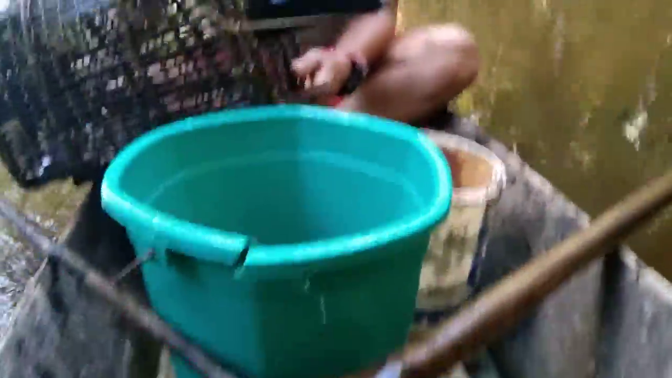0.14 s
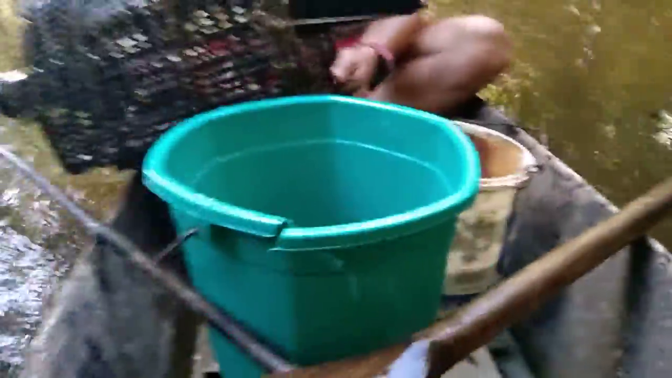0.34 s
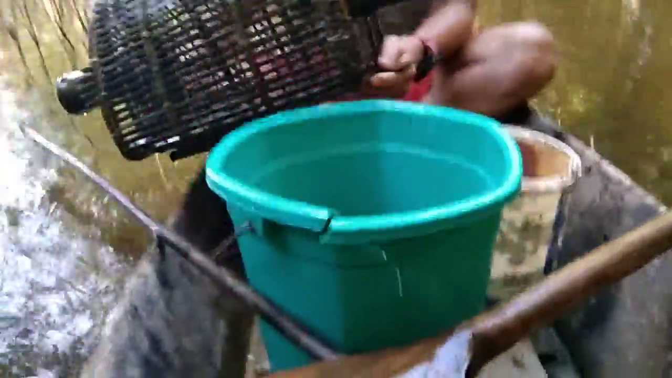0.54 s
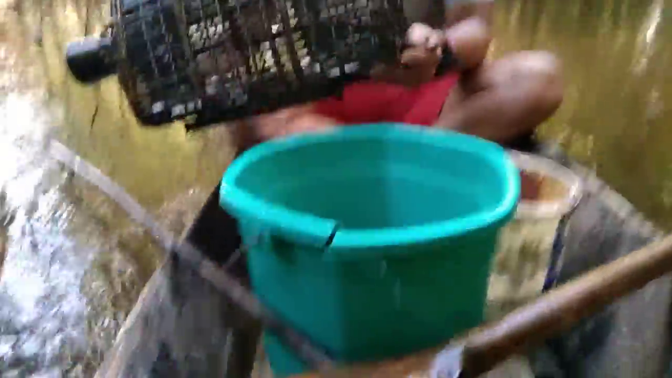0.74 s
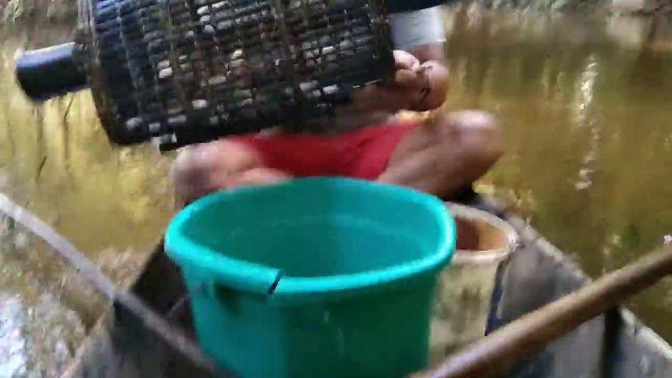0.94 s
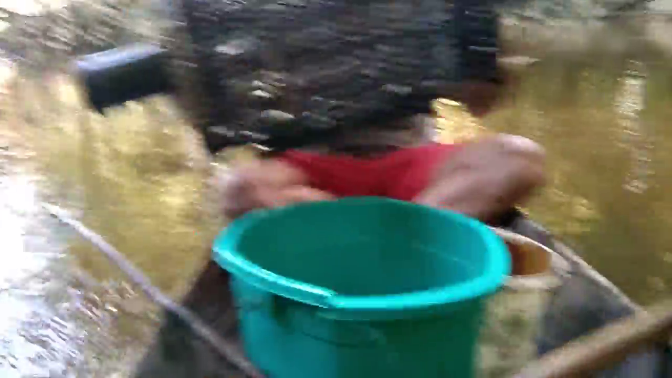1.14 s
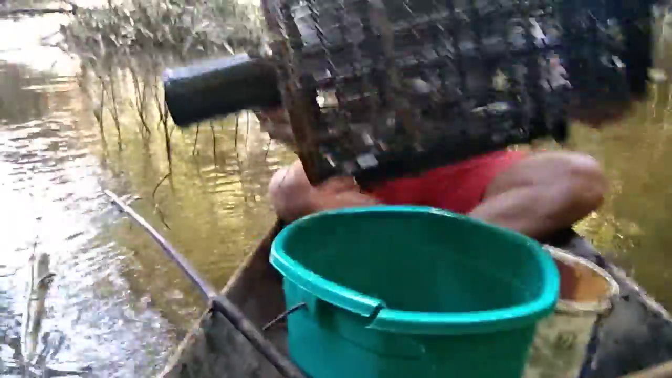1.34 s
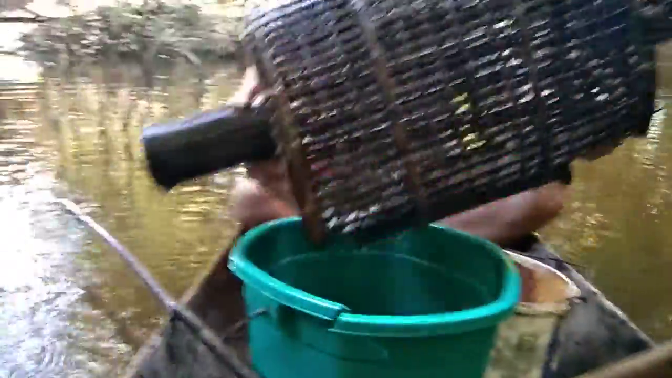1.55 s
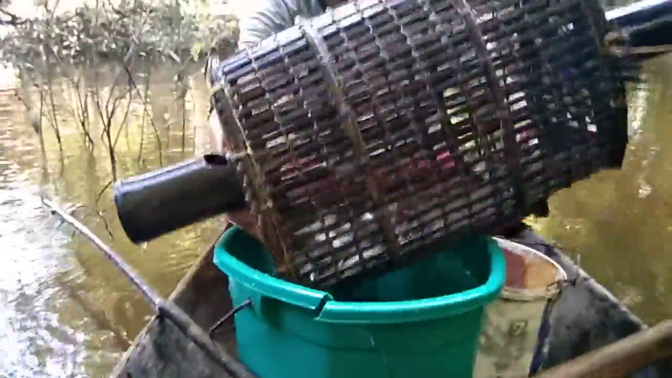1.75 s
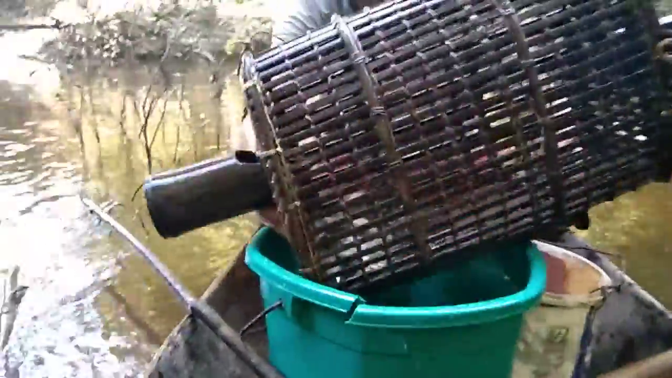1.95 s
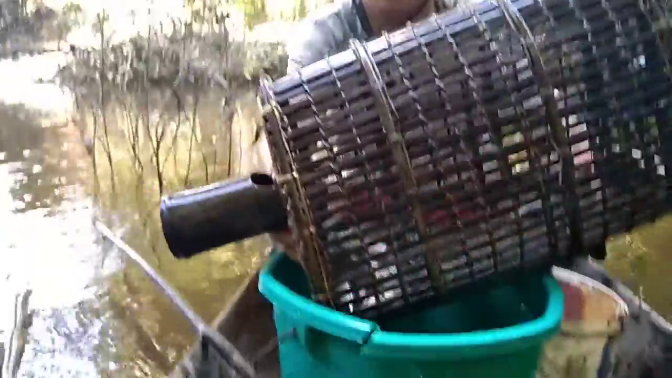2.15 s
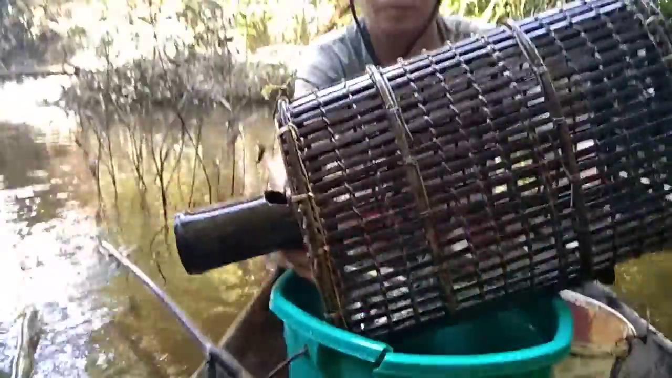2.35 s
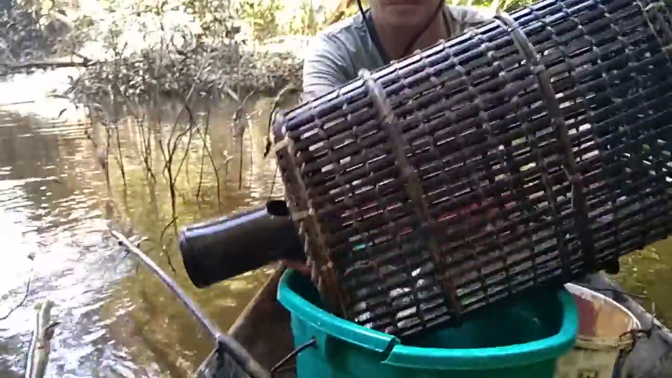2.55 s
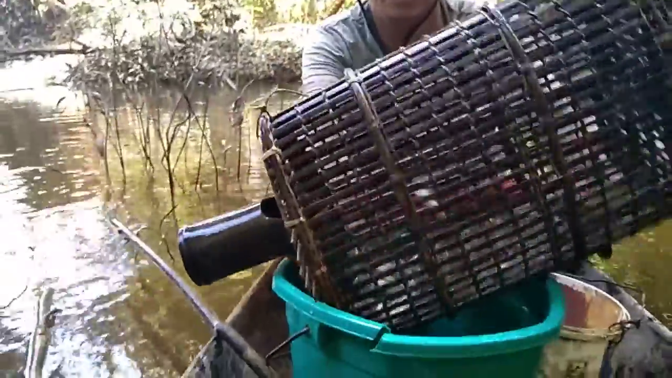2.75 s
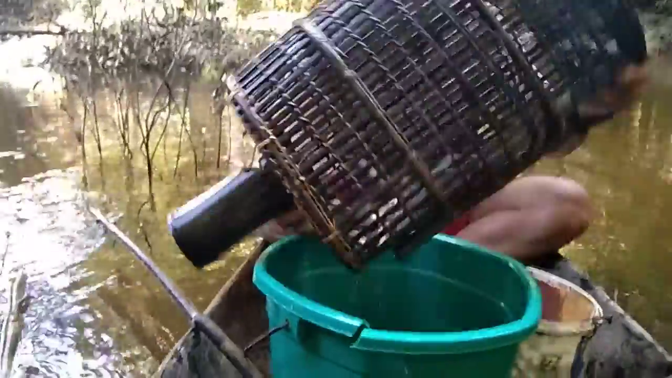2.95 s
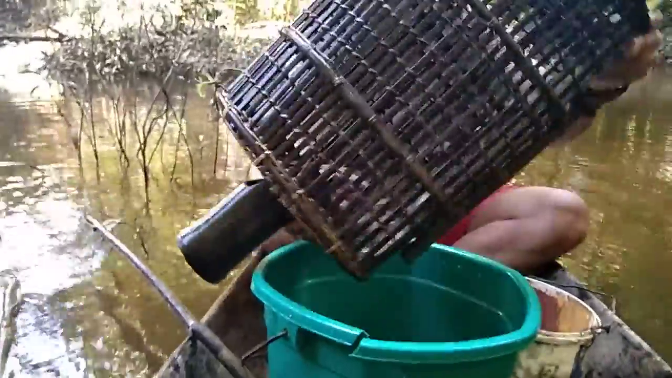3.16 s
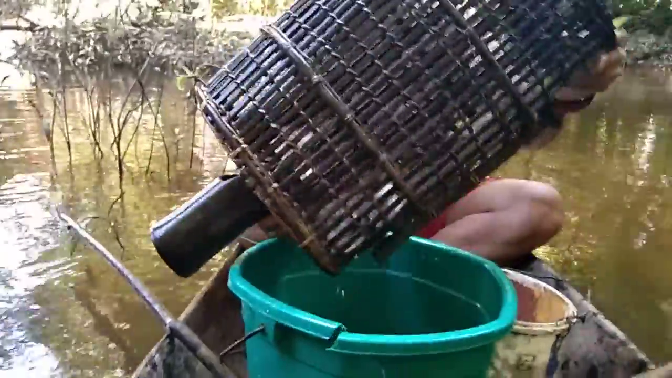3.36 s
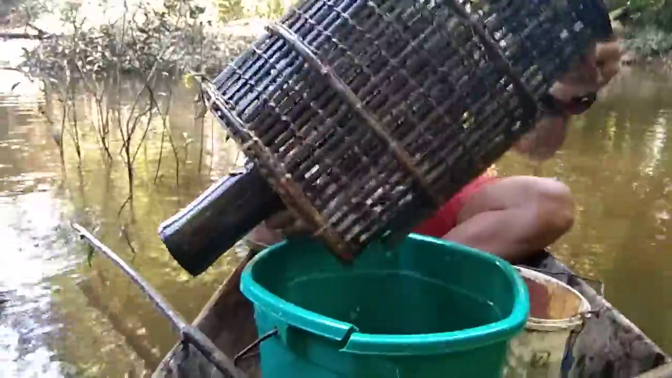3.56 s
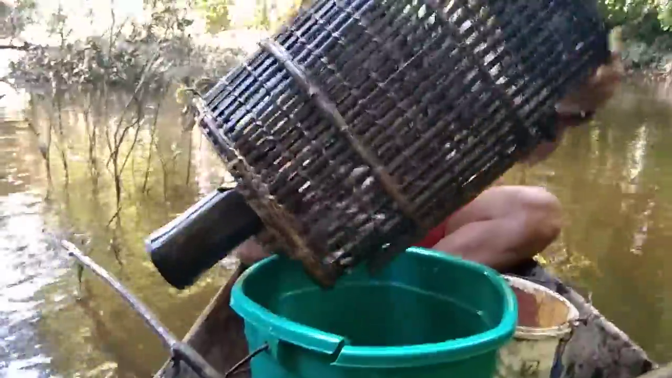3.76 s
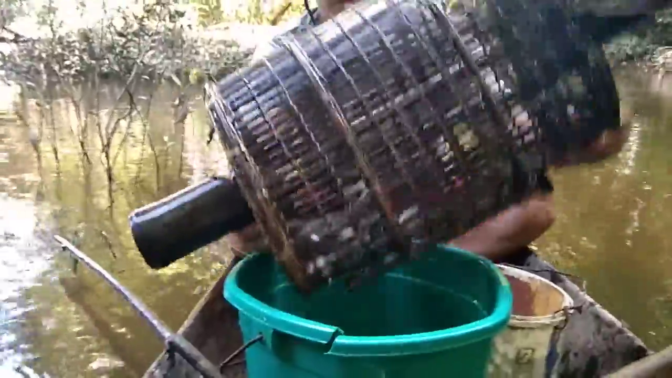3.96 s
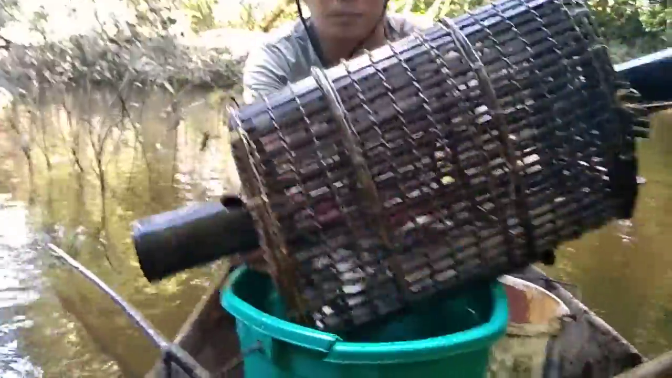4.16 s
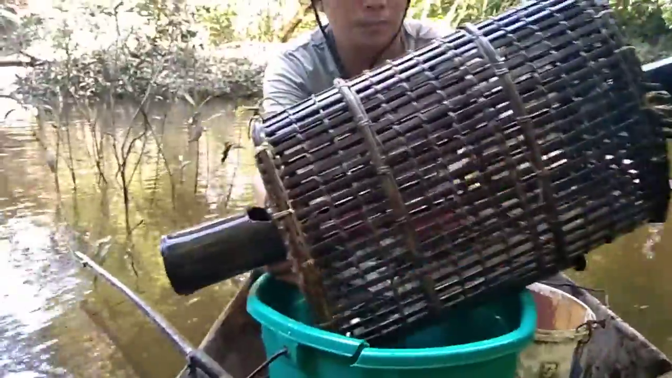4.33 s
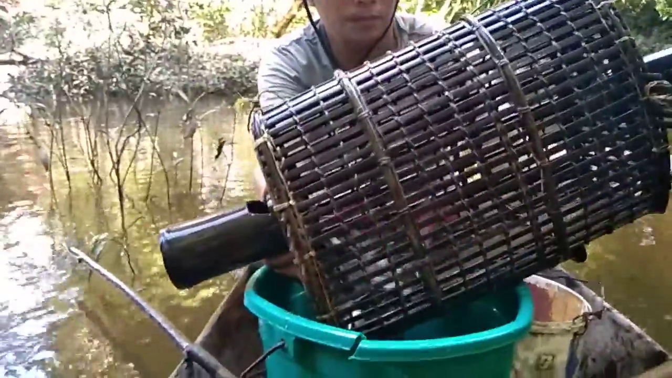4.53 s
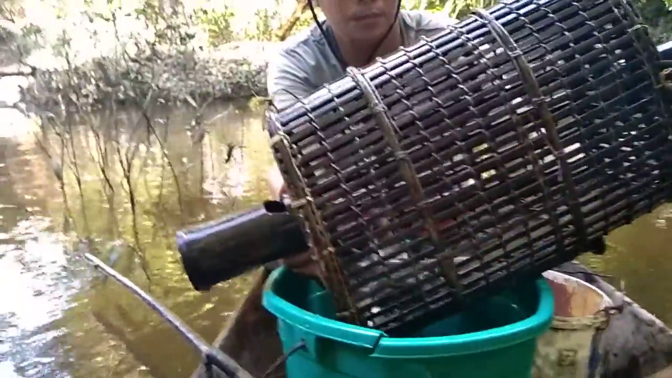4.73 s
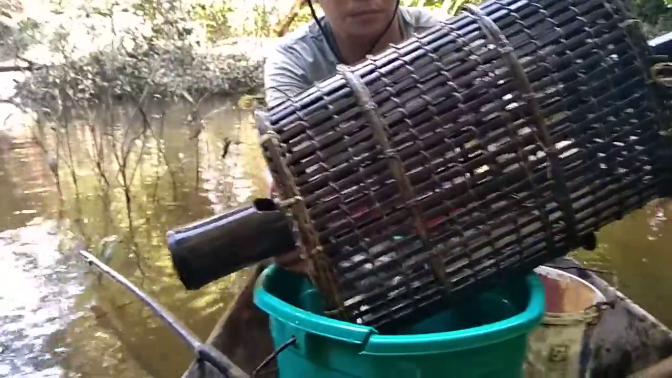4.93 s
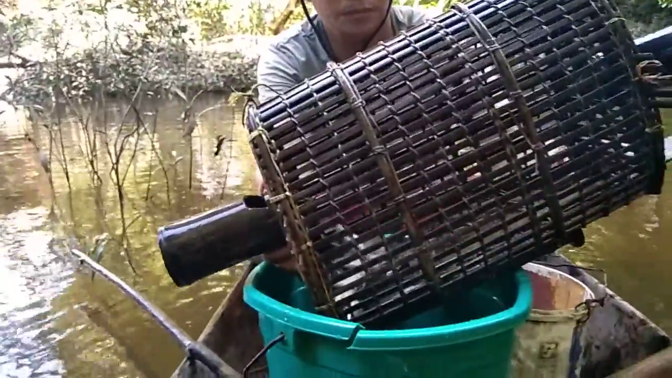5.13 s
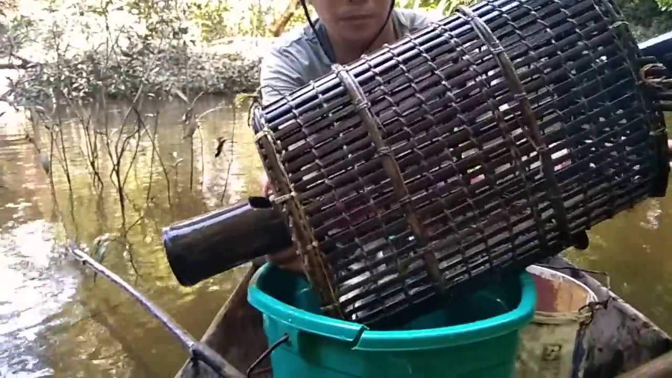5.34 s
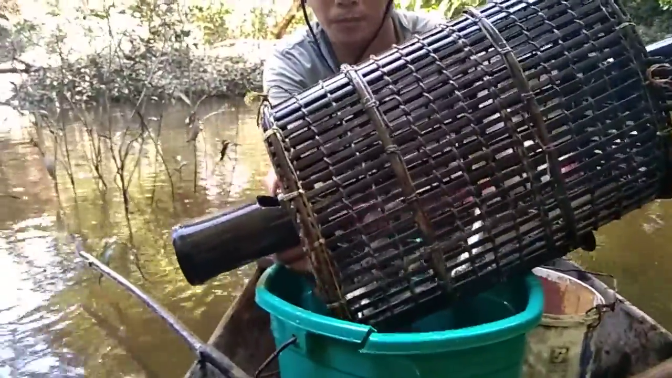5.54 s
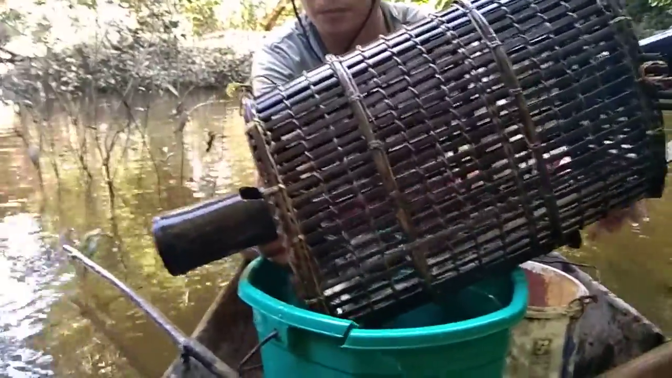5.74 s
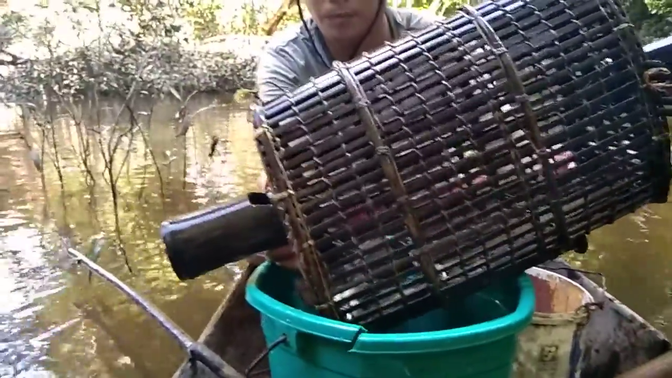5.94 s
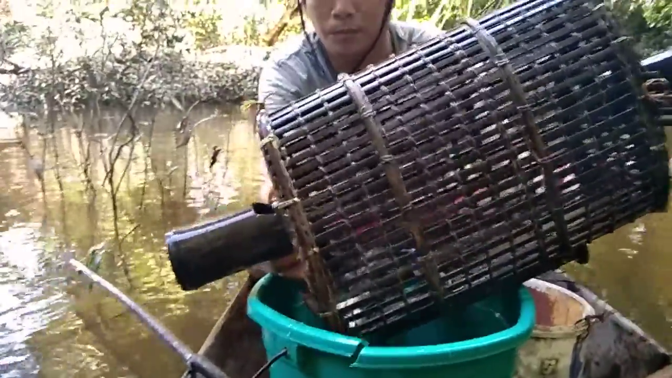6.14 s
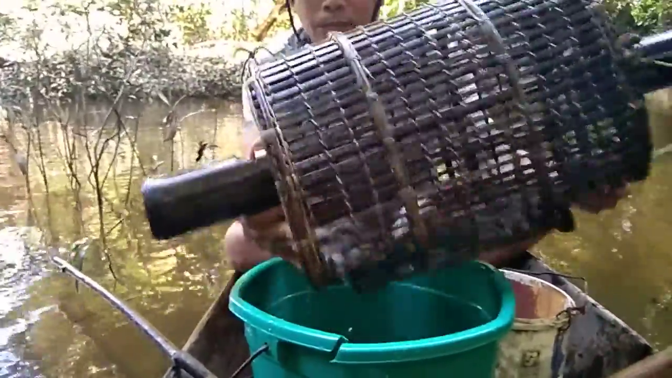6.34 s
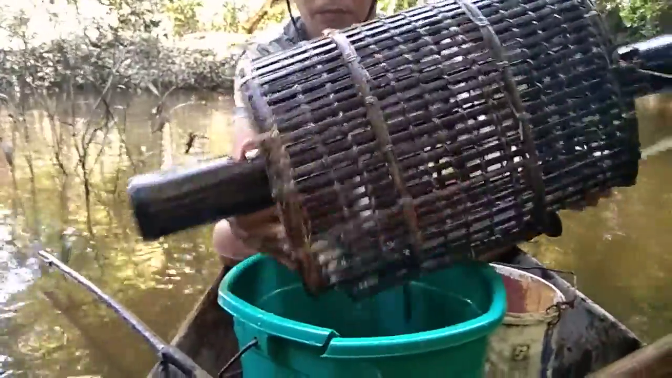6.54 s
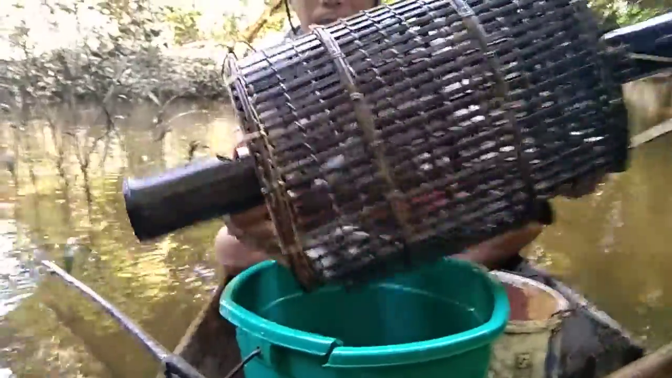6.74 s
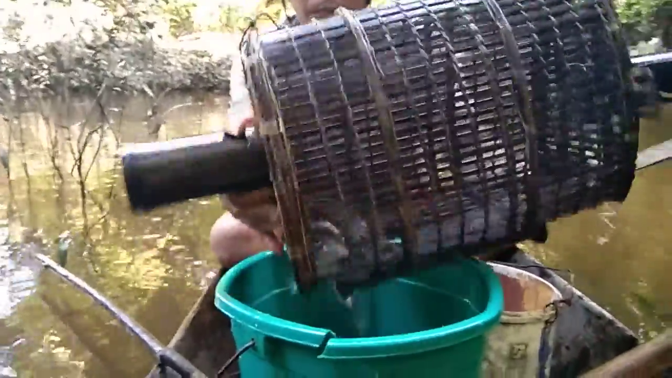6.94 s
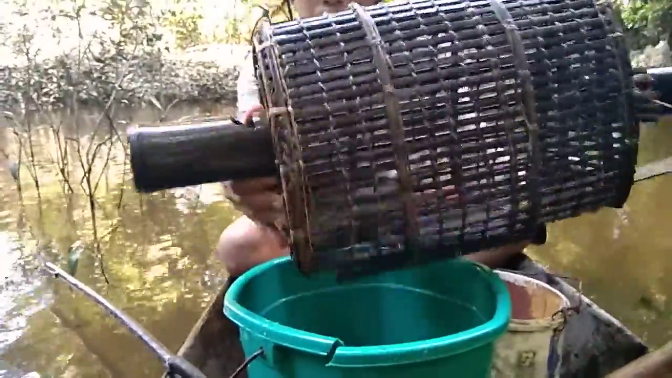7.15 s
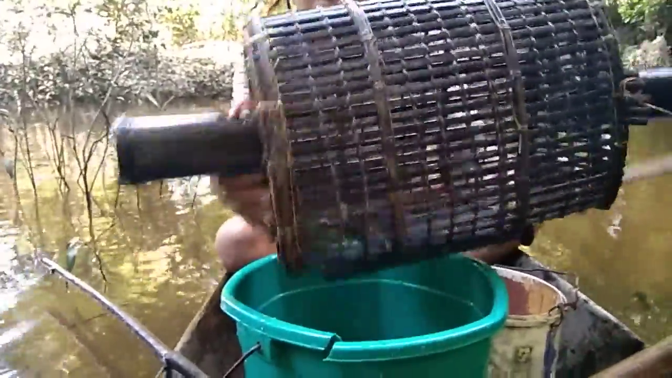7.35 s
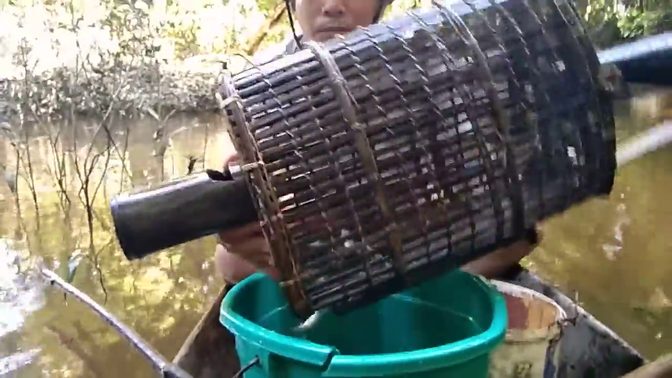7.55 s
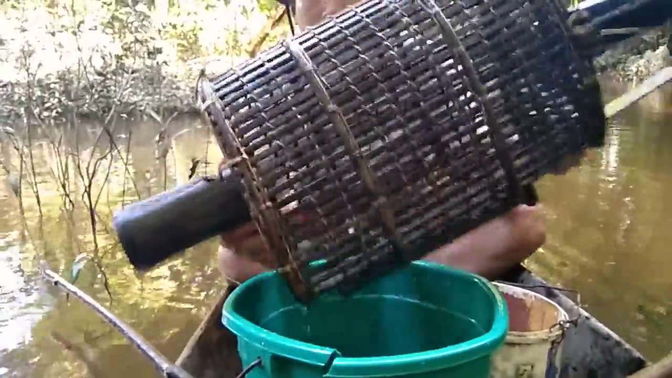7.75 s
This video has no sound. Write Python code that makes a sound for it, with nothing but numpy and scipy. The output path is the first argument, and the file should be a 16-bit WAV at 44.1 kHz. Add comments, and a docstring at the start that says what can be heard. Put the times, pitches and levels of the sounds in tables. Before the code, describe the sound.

Hollow plastic thumps, wet rattling slats and dripping, splashing water come in bursts as a trap is shaken, beneath a thin constant insect whine.

```python
"""A wet slatted fish trap is tipped and shaken over a plastic bucket in a boat on a river.
It knocks on the rim and rings the bucket's damped modes; slats and wet load slap and rattle as bursts of
coloured noise and small ringing modes; water patters, hisses and plops as noise, droplets and rising bubbles.
Insects shrill all the while: beating tones and rasping noise bands.
Faint narrow-band tones, soft gulps under the boat and the river's steady noise lie beneath."""
import sys
import numpy as np
from scipy import signal
from scipy.fft import rfft, irfft, next_fast_len
from scipy.io import wavfile
from scipy.ndimage import uniform_filter1d, map_coordinates

SR = 44100
rng = np.random.default_rng(int(sys.argv[2]) if len(sys.argv) > 2 else 0)


def to_wav(s):
    """Save 16-bit WAV."""
    ch = np.atleast_2d(s).T  # columns
    pcm = np.round(np.clip(ch, -1, 1) * 32767)  # PCM
    wavfile.write(sys.argv[1], SR, pcm.astype(np.int16))


N = 347949
TIME = np.arange(N) / SR


def amp(db):
    """Decibels to gain."""
    return 10 ** (np.asarray(db) / 20)


def unit(x):
    """Scale to rms 1."""
    return x / np.sqrt(np.mean(x ** 2) + 1e-20)


def along(points, hz):
    """(Hz, value) points read on a log frequency axis."""
    f, v = np.transpose(points)
    return np.interp(np.log(hz + 1), np.log(f + 1), v)


def curves(rows):
    """One value per sample for each column after the time."""
    s, *cols = np.transpose(rows)
    return [np.interp(TIME, s, c) for c in cols]


def wobble(rate, size=N):
    """A smooth random curve, rate knots a second."""
    knots = rng.standard_normal(int(size * rate / SR) + 4)
    return map_coordinates(knots, [TIME[:size] * rate])


def filtered(x, response):
    """x times a response of frequency."""
    m = next_fast_len(N + 8192)
    return irfft(rfft(x, m) * response(np.fft.rfftfreq(m, 1 / SR)), m)[:N]


def band_noise(points):
    """Noise of rms 1 with the given colour and nothing outside it."""
    def response(hz):
        inside = (hz > points[0][0]) & (hz < points[-1][0])
        return amp(along(points, hz)) * inside
    return unit(filtered(rng.standard_normal(N), response))


def tick(points, size=1024):
    """A minimum-phase pulse: the given colour with its energy as early as possible."""
    cepstrum = irfft(np.log(amp(along(points, np.fft.rfftfreq(size, 1 / SR)))))
    fold = 1 + np.sign(size // 2 - np.arange(size))
    fold[0] = 1
    return irfft(np.exp(rfft(cepstrum * fold)))


def add(track, s, sound):
    """Mix a sound into the track at s seconds."""
    start = int(np.clip(round(s * SR), 0, N - 1))
    track[start:start + len(sound)] += sound[:N - start]


def swells(rows, rise_db_per_s, fall_db_per_s):
    """Gain of (start s, length s, dB) events that each rise, hold and die away; powers add."""
    total = np.zeros(N)
    for s, length, db in rows:
        before, after = np.maximum(s - TIME, 0), np.maximum(TIME - s - length, 0)
        under = rise_db_per_s * before + fall_db_per_s * after
        near = under < 60
        total[near] += amp(db - under[near]) ** 2
    return np.sqrt(total)


def patter(rate, spread_db):
    """Impulses at random times, rate a second, many small and a few large."""
    chance, size = rng.random((2, N))
    strength = amp(spread_db * np.minimum(-np.log(size + 1e-9), 3))
    return (chance < rate / SR) * strength * rng.choice([-1, 1], N)


def patchy(x, depth_db, bins, frames, size=256):
    """A sound that answers at ever-changing pitches: a random gain over time and frequency."""
    z = signal.stft(x, nperseg=size)[2]
    patch = np.outer(np.hanning(bins), np.hanning(frames))
    field = signal.fftconvolve(rng.standard_normal(z.shape), patch, "same")
    return signal.istft(z * amp(depth_db * np.clip(unit(field), -2, 1.5)), nperseg=size)[1][:N]


def mottled(x):
    """Narrow, shifting resonances colour a sound without changing its overall loudness."""
    y = patchy(x, depth_db=4.5, bins=5, frames=13, size=1024)
    return unit(y) * np.std(x)


def droplets(rate, centre_hz, octaves, cycles, size, rise=0):
    """Crowded drops or ticks, each a few cycles of its own pitch, which rises in a bubble; rms 1."""
    when, pitch, bulk = rng.random((int(rate * N / SR), 3)).T
    hz = np.clip(centre_hz * 2 ** (octaves * (2 * pitch - 1)), 200, 14000)[:, None]
    t = np.arange(size) / SR
    age = hz * t / cycles
    shape = np.exp(-age) * (1 - np.exp(-2 * age))
    notes = np.sin(2 * np.pi * hz * t * (1 + rise * age)) * shape * np.sqrt(hz)
    notes *= amp(5 * np.minimum(-np.log(bulk + 1e-9), 3))[:, None]  # a few are much larger
    where = (when * N).astype(int)[:, None] + np.arange(len(t))
    return unit(np.bincount(where.ravel(), notes.ravel(), N)[:N])


def grains(points, rate):
    """Clumps of soft, wet ticks of one colour; rms 1."""
    power = signal.fftconvolve(unit(patter(rate, spread_db=5.5)) ** 2, np.hanning(70), "same")
    hits = np.sqrt(np.abs(power) + 3) * rng.standard_normal(N) * amp(3.2 * wobble(35))
    coloured = signal.fftconvolve(hits, tick(points))[:N]
    return unit(patchy(coloured, depth_db=4.5, bins=5, frames=23))


def draining():
    """With each shake water patters off the slats while the wet weave rustles, ticks and crackles."""
    # Each row: start in seconds, length in seconds, level of the water in dB, level of the slats in dB
    shakes = [(0.249, 0.47, -75, -65.5), (0.818, 0.365, -70, -78), (1.126, 0.25, -70.5, -63.5),
              (1.858, 0.34, -68.5, -71.5), (2.851, 0.053, -73.5, -63.5), (3.236, 0.055, -67, -63),
              (3.665, 0.27, -76.5, -69.5), (4.315, 0.61, -76, -61.5), (5.19, 0.022, -63.5, -58.5),
              (5.491, 0.15, -62.5, -57), (6.483, 0.44, -74, -63), (6.86, 0.41, -62, -67),
              (7.205, 0.37, -61.5, -62), (7.76, 0.14, -71, -89)]
    # Colours of the water, the slats' rustle and the fine crackle. Each row: frequency in Hz, dB per Hz
    trickle_colour = [(200, -42.5), (500, 7.5), (950, 10.5), (1500, -21), (2300, -2), (3400, 9.5),
                      (5000, -15.5), (7000, -30.5), (12000, -50)]
    slat_colour = [(2000, -60.5), (3600, -10.5), (4500, 9.5), (5200, 2), (7000, -25), (9000, -24.5),
                   (14000, -19.5)]
    crackle_colour = [(4000, -33), (7000, -17.5), (9500, -3.5), (11200, 2), (12200, -4), (14000, -10),
                      (15800, -11.5)]
    rise_db_per_s = 166
    drain_db_per_s, settle_db_per_s = 49, 38  # water running out; weave coming to rest
    seep_db, creep_db = -83.5, -82  # water and weave while the trap is held still
    crackle_db, crackle_grows = -18.5, 0.79  # level under slats at 0 dB, dB per dB of rustle

    water_rows = [(s, length, db) for s, length, db, _ in shakes]
    slat_rows = [(s, length, db) for s, length, _, db in shakes]
    flow = amp(seep_db) + swells(water_rows, rise_db_per_s, drain_db_per_s)
    rustle = amp(creep_db) + swells(slat_rows, rise_db_per_s, settle_db_per_s)
    crackle = amp(crackle_db) * rustle ** crackle_grows

    drops = droplets(rate=900, centre_hz=2000, octaves=1.5, cycles=2.5, size=500)
    bubbles = droplets(rate=110, centre_hz=1800, octaves=1.3, cycles=6, size=1600, rise=.004)
    trickle = .7 * grains(trickle_colour, rate=1500) + .65 * drops + amp(-4) * bubbles
    thin_slats = droplets(rate=45, centre_hz=4400, octaves=.22, cycles=8, size=800)
    weave = .7 * grains(slat_colour, rate=400) + amp(-10) * thin_slats
    return flow * trickle + rustle * weave + crackle * grains(crackle_colour, rate=170)


def bucket_ring(ring_db, crack_db, weight_db, attack, note_hz):
    """The bucket's modes after one contact; a harder one wakes the higher modes, a heavier one the lowest."""
    # The bucket with the trap on its rim, before any choking by the trap's weight.
    # Each row: frequency in Hz (retuned to the main note), level in dB, time to fall 60 dB in seconds
    modes = [(181, -1, 0.059), (225, -2.5, 0.14), (281.7, 4, .08), (338, 2, 0.14), (415, -0.5, 0.065),
             (460, -11, 0.066), (676, -13, 0.093), (852, -4, 0.036), (948, 0.5, 0.095), (990, -0.5, 0.028),
             (1220, -2, 0.032), (1455, -14, .045), (1720, -9.5, 0.027), (1990, -4, 0.065),
             (2700, -14.5, .04), (3170, -9.5, .04)]
    rim_detune = 0.0061  # scatter of the modes' pitch as the trap's weight shifts on the rim
    t = np.arange(SR // 4) / SR
    hz, db, t60 = np.transpose(modes)
    balance = [(200, weight_db), (320, 0), (430, 0), (750, ring_db), (1300, ring_db), (2200, crack_db)]
    db = db + along(balance, hz) + rng.standard_normal(len(hz))
    detune = note_hz / hz[3] * (1 + rim_detune * rng.standard_normal(len(hz)))
    signs = (-1) ** np.arange(len(hz))[:, None]
    waves = np.sin(2 * np.pi * np.outer(hz * detune, t)) * signs
    rise = 1 - np.exp(-np.outer(hz / note_hz, t) / attack)  # higher modes speak sooner
    return (waves * rise * amp(db[:, None] - 60 * t / t60[:, None])).sum(0)


def drumming():
    """The trap jiggles and drags on the rim and water lands on different spots of the bucket."""
    # Each row: start in seconds, length in seconds, level in dB
    jiggles = [(0, 0.45, -62.5), (1.95, 0.39, -73.5), (2.77, 0.2, -57), (4.33, 0.41, -53.5),
               (4.9, 0.99, -63.5), (5.9, 0.31, -67.5), (7.18, 0.19, -47.5)]
    # Slats dragging on the rim. Each row: frequency in Hz, dB per Hz
    rub_colour = [(110, -15.5), (230, 5.5), (335, 12), (450, -16), (600, -21), (800, -16.5), (950, 3),
                  (1150, -26), (1500, -18), (2100, -16), (2800, -28.5)]
    landings = np.zeros(N)
    for spot in range(6):
        hits = patter(rate=9, spread_db=6.0)
        ring = bucket_ring(ring_db=-7.5, crack_db=-7.0, weight_db=5.0, attack=0.0058, note_hz=328.0)
        landings += signal.fftconvolve(hits, ring)[:N]
    contact = .7 * unit(landings) + .7 * grains(rub_colour, rate=300)
    level = swells(jiggles, rise_db_per_s=292, fall_db_per_s=98)
    return level * unit(contact * amp(2.9 * wobble(18)))


def pouring():
    """A sheet of water breaks into countless fine drops: a close hiss with dense patter and small bubbles."""
    # Each row: start in seconds, length in seconds, level in dB
    sheets = [(0, 0.0062, -49.5), (.25, 0.15, -51.5), (.5, 0.15, -57.5), (7.2, 0.046, -54)]
    # Each row: frequency in Hz, dB per Hz
    colour = [(120, -10), (300, 1), (650, 0), (1200, -6), (2300, -3), (3400, 7), (4800, -4), (5800, 0.5),
              (7500, -34), (12000, -33)]
    hiss = unit(mottled(band_noise(colour)) * amp(2 * wobble(160)))
    fizz = droplets(rate=800, centre_hz=2600, octaves=.9, cycles=4, size=500)
    bubbles = droplets(rate=300, centre_hz=1100, octaves=1.2, cycles=4, size=1400, rise=.004)
    level = swells(sheets, rise_db_per_s=187.5, fall_db_per_s=81.5)
    return level * (.5 * hiss + .68 * fizz + amp(-6) * bubbles)


def shrill(width_hz, skirt_db, octave_db):
    """Many crickets on nearly one pitch beat into a fluttering whistle with a rough edge and a weak octave."""
    # The crickets' common note. Each row: time in seconds, pitch in Hz
    pitch = [(0.0, 6440), (0.28, 6461), (4.84, 6458), (6.28, 6395), (7.8, 6427)]
    waver_hz = 21.9
    hz, = curves(pitch)
    phase = 2 * np.pi * np.cumsum(hz + waver_hz * wobble(28)) / SR

    def beats(width):
        return filtered(rng.standard_normal(N), lambda f: 1 / (1 + (f / width) ** 4))

    def voices(turn, width):
        return unit(beats(width) * np.cos(turn) + beats(width) * np.sin(turn))

    skirt = amp(skirt_db) * voices(phase, 3 * width_hz)
    octave = amp(octave_db) * voices(2 * phase, 2.0 * width_hz)
    return voices(phase, width_hz) + skirt + octave


def cricket_whistle():
    """The crickets' shared note, its level drifting slowly and fluttering fast."""
    # Each row: time in seconds, relative level in dB
    loudness = [(0.0, -53.5), (0.76, -60), (1.65, -53), (4.91, -56.5), (5.24, -58), (7.34, -51.5),
                (7.8, -51.5)]
    flutter_db = 1.34
    level_db, = curves(loudness)
    level = amp(level_db + 1.03 + flutter_db * wobble(120))
    return level * shrill(width_hz=68.0, skirt_db=-8.5, octave_db=-21.5)


def insect_chorus():
    """A rasping chorus around the whistle: noise in narrow bands with ever-shifting gains."""
    # Each row: frequency in Hz, dB per Hz
    colour = [(5300, -22.5), (5750, 5.5), (6000, -18), (6700, -32), (6900, 3.5), (7200, -16), (7500, 3.5),
              (8000, -16), (8300, -11.5), (8650, -3), (9100, -12.5), (10000, -22.5)]
    # Each row: time in seconds, relative level in dB
    loudness = [(0.0, -78), (3.08, -61.5), (3.28, -60.5), (5.17, -66.5), (5.87, -63), (6.36, -70),
                (7.23, -56.5), (7.8, -67.5)]
    level_db, = curves(loudness)
    rasps = patchy(band_noise(colour), depth_db=6.5, bins=5, frames=13, size=1024)
    rasps = unit(rasps * amp(1.2 * wobble(14)))
    return amp(level_db + 3.5) * rasps


def river():
    """The river's steady, mostly low noise."""
    # Each row: frequency in Hz, dB per Hz
    colour = [(20, -25.5), (60, 1), (120, -6.5), (300, 0), (600, -25), (2000, -17.5), (8000, -49),
              (15000, -20)]
    return amp(-79.0) * band_noise(colour)


def slaps():
    """Wet slats and load smack together: a burst of tiny contacts, then a faint spatter."""
    # Each row: start in seconds, relative snap level in dB, brightness in dB (hollow below 0, spray above)
    smacks = [(.075, -43.5, -27), (0.316, -48, -33), (0.534, -30.5, -21), (0.664, -42, -15),
              (0.702, -45, -23.5), (0.979, -38, -5.5), (1.021, -38.5, -11.5), (1.179, -42.5, -6.5),
              (1.773, -44.5, -2), (2.056, -43.5, -11.5), (2.186, -39.5, -5.5), (2.349, -43.5, -4),
              (3.264, -31, -4.5), (3.29, -47, 10.5), (4.295, -30.5, -11.5), (4.73, -43.5, -3),
              (4.77, -49, 9.5), (5.19, -38.5, -1), (5.219, -37, 2), (5.790, -37.5, -6.5), (6.129, -34.5, 2),
              (6.789, -31, -2), (6.978, -24.5, 1), (7.122, -35, 0.5), (7.189, -32.5, 2), (7.256, -31, 5),
              (7.301, -27, -5), (7.317, -27.5, -4), (7.328, -21.5, -4), (7.456, -28.5, -5),
              (7.744, -38, 5.5), (7.844, -41.5, 8.5), (7.870, -22.5, -0.5)]
    plain_hollow_db, plain_spray_db = -12.5, -3  # low and high parts at brightness 0, against the snap
    out, t = np.zeros(N), np.arange(SR // 6) / SR
    spatter = amp(-25 - 60 * t / .2)
    swell = (1 - np.exp(-t / 0.002)) ** 2 * (amp(-60 * t / 0.027) + spatter)
    for s, db, bright_db in smacks:
        hollow_db, spray_db = plain_hollow_db - bright_db, plain_spray_db + bright_db
        colour = [(150, hollow_db - 16.0), (1200, hollow_db - 3.0), (2300, hollow_db),
                  (3400, hollow_db / 2), (4600, -1), (7500, 0.77 * spray_db + 3.0),
                  (10000, spray_db - 0.5), (12000, spray_db - 12), (15000, spray_db - 20.0)]
        burst = signal.fftconvolve(rng.standard_normal(len(t)) * swell, tick(colour))
        add(out, s - .001, amp(db + 10.0) * burst)
    return patchy(out, depth_db=4, bins=7, frames=11)


def knocks():
    """The trap bumps the bucket: a hollow ring under a short crunch of slats."""
    # Each row: start in seconds, relative level in dB, relative hardness of the wall's ring in dB,
    # relative weight of the low thud in dB, the bucket's main note in Hz under that load
    bumps = [(0.076, -34, -7.5, -22, 335), (.123, -44, 1, -9, 329), (.297, -21.5, -13, -14, 292.5),
             (.666, -39.5, -10, 9.5, 316), (1.138, -46, -6.5, -15, 406), (1.886, -17.5, -7.5, 8.5, 342.7),
             (1.926, -28.5, -4, 16.5, 338), (2.188, -28.5, 0.5, 9, 325), (2.206, -33, -33.5, 13.5, 312),
             (2.84, -45, -13, 14.5, 324), (2.973, -36.5, -2, -1, 336), (3.017, -35.5, -8.5, 8.5, 320),
             (4.219, -12, -7, 5.5, 333.5), (4.234, -20.5, -8, 5, 334), (4.296, -33.5, 9, 16, 320),
             (4.401, -42.5, -1, 13, 331), (4.601, -39, 3, 2, 325), (4.761, -45, 2.5, 17, 324),
             (5.191, -39, -8.5, -35, 333), (5.222, -41.5, 7, 6, 335), (5.297, -33.5, -20.5, 5, 350),
             (5.601, -34.5, -10, -12, 322.6), (5.719, -32, -9.5, -18, 347), (5.775, -36.5, -12, 18.5, 330),
             (6.129, -44.5, -5, 5.5, 321), (6.952, -31.5, -10, -10, 318), (6.978, -21.5, -4, -1.5, 344),
             (7.196, -26, -18.5, -15, 346), (7.222, -37, -13, -9, 347), (7.404, -25.5, -7, -21, 323),
             (7.458, -24.5, -1, -7, 340), (7.727, -40, -8, -5.5, 339.5)]
    damp_db_per_s = 168.5  # the trap's weight chokes the ring
    out, t = np.zeros(N), np.arange(SR // 4) / SR
    for s, db, ring_db, weight_db, note_hz in bumps:
        crack_db = -9.5 + ring_db  # the highest modes follow the hardness
        ring = bucket_ring(ring_db + 8.5, crack_db + 10.0, weight_db, attack=0.0048, note_hz=note_hz)
        ring *= amp(-damp_db_per_s * t)
        ring /= np.sqrt(np.sum(ring ** 2) / (.06 * SR))  # equal energy for every ring
        colour = [(30, weight_db - 40.0), (110, weight_db - 10.5), (300, 8.0), (550, -7.5),
                  (1100, ring_db + 1.0), (2000, crack_db - 3.0), (5000, crack_db - 13.5),
                  (12000, crack_db - 36)]
        burst = rng.standard_normal(len(t)) * amp(-60 * t / .075)
        crunch = signal.fftconvolve(burst, tick(colour))[:len(t)]
        add(out, s, amp(db - 17.0) * ring + amp(db + 7.0) * crunch)
    return out


def plops():
    """Each air pocket closes into a rising bubble with companions and a splash; low ones ring longer."""
    # Single drips and air pockets closing in the wet load.
    # Each row: start in seconds, level in dB, pitch in Hz
    pockets = [(0.204, -34, 2090), (0.214, -23.5, 6250), (1.39, -42.5, 3520), (0.23, -21.5, 2230),
               (0.244, -26.5, 4590), (0.258, -35, 3020), (0.273, -37, 1890), (1.18, -52, 360),
               (1.237, -35.5, 5100), (1.296, -35.5, 6050), (1.339, -32, 4970), (1.242, -50.5, 420),
               (1.475, -51, 408), (1.583, -50.5, 395), (1.725, -58, 683), (3.241, -35.5, 1530),
               (3.26, -44.5, 1837), (3.775, -53, 665), (6.814, -39, 1364), (6.905, -22, 2780),
               (6.921, -32, 1700), (6.933, -31, 3070), (7.116, -31.5, 2810), (7.12, -29, 1940),
               (7.429, -45, 950), (7.632, -36.5, 4040), (7.811, -21, 10840)]
    cycles, climb = 59, 0.13  # cycles until 60 dB down, share by which the pitch climbs meanwhile
    cluster_db, splash_db = 2, -5  # against the main bubble
    out, t = np.zeros(N), np.arange(SR // 6) / SR
    for s, db, hz in pockets:
        t60 = cycles / hz
        pitch, phase = rng.standard_normal((2, 8, 1))
        turns = hz * t * (1 + climb * t / t60 / 2)
        bubble = unit(np.sin(2 * np.pi * turns))
        cluster = unit(np.sin(2 * np.pi * ((1 + .12 * pitch) * turns + phase)).sum(0))
        colour = [(hz / 4, -18), (hz, 0), (2 * hz, -8), (4 * hz, -35)]
        splash = unit(signal.fftconvolve(rng.standard_normal(len(t)), tick(colour))[:len(t)])
        shape = (1 - np.exp(-hz * t / 2.5)) ** 2 * amp(-60 * t / t60)
        burst = (bubble + amp(cluster_db) * cluster + amp(splash_db) * splash) * shape
        add(out, s, amp(db) * burst * np.linalg.norm(shape) / np.linalg.norm(burst))
    return out


def bush_cricket():
    """A bush cricket repeats its high buzz, a little louder each time; each call swells and fades."""
    # Each row: frequency in Hz, dB per Hz
    colour = [(9600, -48.5), (10400, 0.5), (11000, 10.5), (11400, 5.5), (11900, -25.5), (13000, -68)]
    first_s, period_s, count = 0.564, .648, 6
    first_db, grows_db = -63, 1.46  # level of the first call, gain per call
    attack_s, fade_db_per_s = 0.036, 31.5
    calls, t = np.zeros(N), np.arange(SR) / SR
    swell = np.minimum(t / attack_s, 1) * amp(-fade_db_per_s * t)
    for k in range(count):
        add(calls, first_s + k * period_s, amp(first_db + k * grows_db) * swell)
    return calls * band_noise(colour)


def faint_bands():
    """Faint narrow bands of noise, each held briefly at one pitch."""
    # Each row: start in seconds, length in seconds, level in dB, pitch in Hz
    bands = [(0.807, 0.25, -73, 714), (1.456, 0.33, -71.5, 2268), (2.545, 0.064, -72.5, 2790)]
    width = 0.046  # band width as a share of the pitch
    out, t = np.zeros(N), np.arange(SR // 2) / SR
    for s, length, db, hz in bands:
        rate = 2 * width * hz
        blur = wobble(rate, size=len(t)) + 1j * wobble(rate, size=len(t))
        shape = np.minimum(t / 0.0087, 1) * amp(-170 * np.maximum(t - length, 0))
        add(out, s, amp(db) * shape * unit(np.real(blur * np.exp(2j * np.pi * hz * t))))
    return out


def squeaks():
    """A slat slips in its binding as the wet weave shifts: a short, rough note that sags and fades."""
    # Each row: start in seconds, level in dB, pitch in Hz
    slips = [(1.41, -57, 778), (1.47, -54.5, 411), (1.55, -52, 403), (6.058, -55, 549), (6.415, -54.5, 648)]
    t60_s, sag_per_s, rough = 0.099, .25, 0.022  # fade; share of pitch lost a second; pitch jitter
    top_hz = 2460  # overtones above this fall away steeply
    out, t = np.zeros(N), np.arange(SR // 4) / SR
    for s, db, hz in slips:
        pitch = hz * (1 - sag_per_s * t + rough * wobble(270, size=len(t)))
        turns = np.cumsum(pitch) / SR
        note = np.zeros(len(t))
        for k in range(1, 6):
            overtone = np.sin(2 * np.pi * (k * turns + rng.random()))
            note += overtone / (1 + (k * hz / top_hz) ** 12) / k ** .5
        add(out, s, amp(db - 60 * t / t60_s) * (1 - np.exp(-t / 0.0078)) * unit(note))
    return out


def nudges():
    """The trap leans softly on the rim and the bucket's lower modes swell into a hum with no crunch."""
    # Each row: start in seconds, relative level in dB, relative hardness of the wall's ring in dB,
    # the bucket's main note in Hz
    leans = [(1.826, -55, -16.5, 266), (2.347, -57, 6, 334), (2.421, -66, 6, 324), (2.595, -62, 3, 343),
             (2.755, -48.5, -28, 296), (4.505, -56, -2, 366), (4.545, -48.5, 2, 314),
             (5.453, -43.5, -23, 294), (5.97, -56.5, -35, 282), (6.2, -49.5, -12, 308),
             (6.279, -60, -29, 317), (6.323, -52, -9, 338), (6.37, -55.5, -5, 337),
             (6.407, -49.5, -12.5, 339), (6.688, -59, -4.5, 349)]
    out = np.zeros(N)
    for s, db, ring_db, note_hz in leans:
        ring = bucket_ring(ring_db + 5.5, ring_db - 12.5, weight_db=-1, attack=.009, note_hz=note_hz)
        add(out, s, amp(db + 5) * ring / np.abs(ring).max())
    return out


def gulps():
    """The boat rocks and water gulps under it: a soft, unsteady, sinking note."""
    # Each row: start in seconds, relative level in dB, starting pitch in Hz
    notes = [(2.103, -48.5, 152), (3.549, -54, 149), (4.786, -56, 160)]
    out, t = np.zeros(N), np.arange(SR // 10) / SR
    for s, db, hz in notes:
        pitch = hz * np.exp(-t / .11 + .25 * wobble(90)[:len(t)])
        add(out, s, amp(db - 5.5) * np.hanning(len(t)) * np.sin(2 * np.pi * np.cumsum(pitch) / SR))
    return out


def cicada():
    """A far cicada hisses once: two bands of noise that swell and slowly fade."""
    # Main hiss and upper band. Each row: frequency in Hz, dB per Hz
    hiss_colour = [(3600, -35), (4050, -3.5), (4500, -4), (4850, -14.5), (5150, -27)]
    sizzle_colour = [(8200, -10), (8700, 2.5), (9600, -10), (11500, -2.5), (12500, 2.5), (12900, -8),
                     (13500, -17.5), (15800, -13)]
    call = (2.12, 0.13, -60.5)  # start s, hold s, dB
    level = swells([call], rise_db_per_s=82.5, fall_db_per_s=14.5)
    return level * (band_noise(hiss_colour) + amp(-11.5) * band_noise(sizzle_colour))


def slat_ticks():
    """As the load shifts a single slat snaps into place and rings for a moment in a narrow band."""
    # Each row: start in seconds, relative level in dB, pitch in Hz
    snaps = [(2.8374, -46, 4190), (2.8677, -50, 4030), (3.3962, -52, 4550), (3.4615, -51.5, 4630),
             (3.7235, -37, 4500), (3.866, -45, 4370), (3.9544, -54, 3270), (5.5488, -43.5, 4300)]
    t60_s = .022
    out, t = np.zeros(N), np.arange(SR // 20) / SR
    for s, db, hz in snaps:
        note = unit(wobble(900, size=len(t)) * np.sin(2 * np.pi * hz * t))
        add(out, s, amp(db - 2 - 60 * t / t60_s) * note)
    return out


def scrapes():
    """Wet slats stick and slip over each other at an uneven rate; every slip rings their modes."""
    # Each row: start in seconds, length in seconds, level in dB
    drags = [(4.5, .09, -62.5), (4.73, 0.056, -61.5), (5.195, 0.037, -50), (5.59, 0.043, -64),
             (5.73, 0.11, -57.5), (6.69, 0.05, -55), (7.3, 0.023, -47.5)]
    # What the slats ring with. Each row: frequency in Hz, level in dB, time to fall 60 dB in seconds
    modes = [(942, -9.5, 0.067), (1953, -7.5, 0.028), (2680, -11.5, 0.069), (3430, 2, 0.019),
             (4605, 1, 0.026), (5050, -1.5, .016)]
    t = np.arange(SR // 20) / SR
    slips = patter(rate=420, spread_db=5.5)
    rasp = np.zeros(N)
    for hz, db, t60 in modes:
        ring = amp(db - 60 * t / t60) * np.sin(2 * np.pi * hz * t)
        hits = slips * rng.standard_normal(N)  # each slip strikes each mode differently
        rasp += signal.fftconvolve(hits, ring)[:N]
    return swells(drags, rise_db_per_s=700, fall_db_per_s=293) * unit(rasp)


def chinks():
    """The bright, shimmering ring that follows the hardest clacks: fading noise in narrow bands."""
    # Each row: start in seconds, level in dB
    clacks = [(6.981, -47), (7.328, -40), (7.871, -44)]
    # Each row: frequency in Hz, dB per Hz
    colour = [(4400, -33), (4620, -11), (5100, -39), (5830, -7), (6100, -27), (6830, -1), (7300, 1),
              (7800, 13), (8500, -25), (9500, -33)]
    t60_s = 0.24
    fade, t = np.zeros(N), np.arange(SR // 3) / SR
    for s, db in clacks:
        add(fade, s, amp(db - 60 * t / t60_s))
    return fade * band_noise(colour)


def thin_bass(x, corner_hz):
    """Small bodies radiate little bass."""
    return signal.sosfilt(signal.butter(2, corner_hz, "high", fs=SR, output="sos"), x)


def hull(x):
    """A short, dull answer from the boat's sides: a decaying noise tail."""
    t = np.arange(SR // 3) / SR
    tail = rng.standard_normal(len(t)) * amp(-60 * t / .28) * np.minimum(t / .006, 1)
    colour = [(300, 0.5), (3000, -9), (10000, -5.0)]
    tail = signal.fftconvolve(tail / np.linalg.norm(tail), tick(colour))
    return signal.fftconvolve(x, tail)[:N]


def suppress(x, depth):
    """The noise suppressor turns down every band that falls near its threshold."""
    # Threshold of each band. Each row: frequency in Hz, level in dB
    threshold = [(100, -100), (600, -85.5), (3000, -88.5), (9000, -92.5), (15000, -104.5)]
    hz, _, z = signal.stft(x, SR, nperseg=512)
    smooth = uniform_filter1d(np.abs(z) ** 2, size=3, axis=0)
    power = np.abs(uniform_filter1d(smooth, size=5, axis=1))
    gain = (power / (power + amp(along(threshold, hz))[:, None] ** 2)) ** depth
    return signal.istft(z * np.maximum(gain, .12), SR, nperseg=512)[1][:N]


def scene():
    """Trap and bucket close by, insects and river beyond."""
    bucket = patchy(knocks() + nudges(), depth_db=1.5, bins=3, frames=7, size=512) + mottled(drumming())
    slats = slaps() + chinks() + squeaks() + slat_ticks() + scrapes()
    water = plops() + mottled(draining()) + pouring()  # draining carries the weave's rustle too
    near = thin_bass(bucket, corner_hz=100) + slats + water
    insects = cricket_whistle() + insect_chorus() + cicada() + bush_cricket()
    return (near + amp(-7.0) * hull(near) + gulps() + faint_bands() + insects + river())[None]


def record(dry):
    """The phone hushes faint noise and keeps nothing above its band limit."""
    top_hz = 15850
    return filtered(suppress(dry[0], depth=0.77), lambda hz: hz < top_hz)[None]


dry = scene()
out = record(dry)
to_wav(out)
```